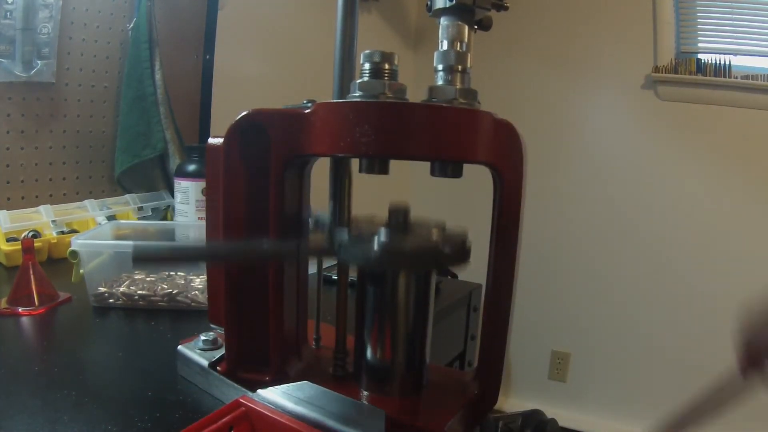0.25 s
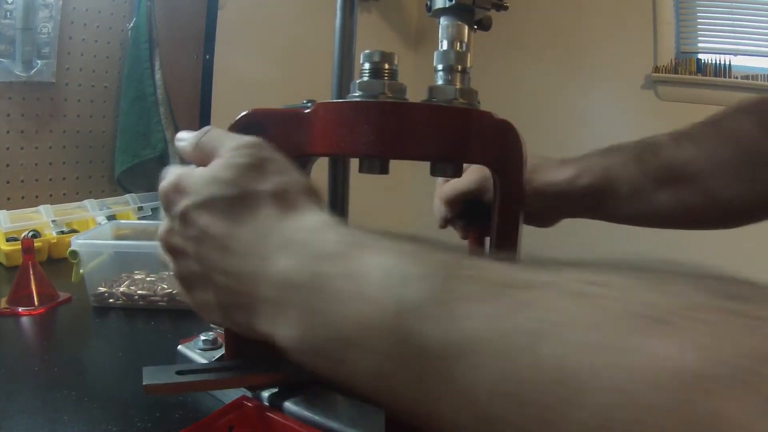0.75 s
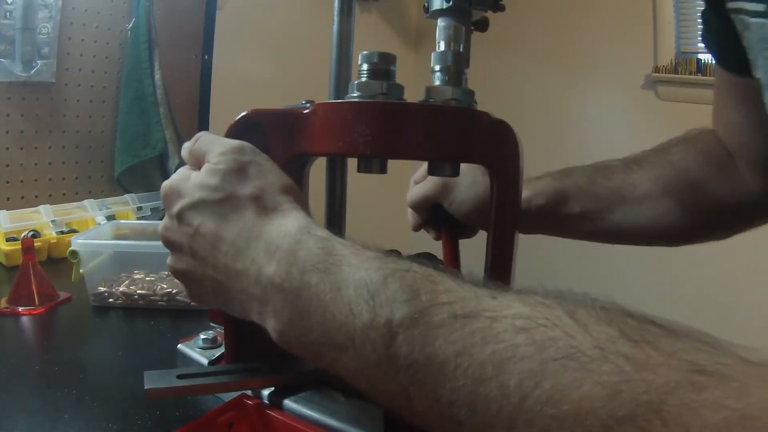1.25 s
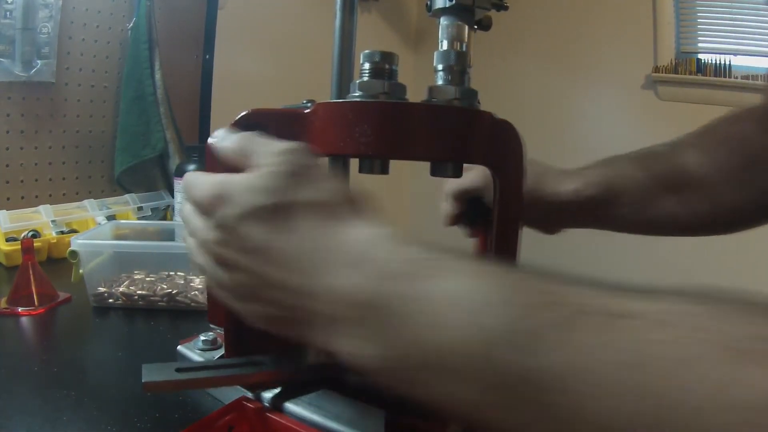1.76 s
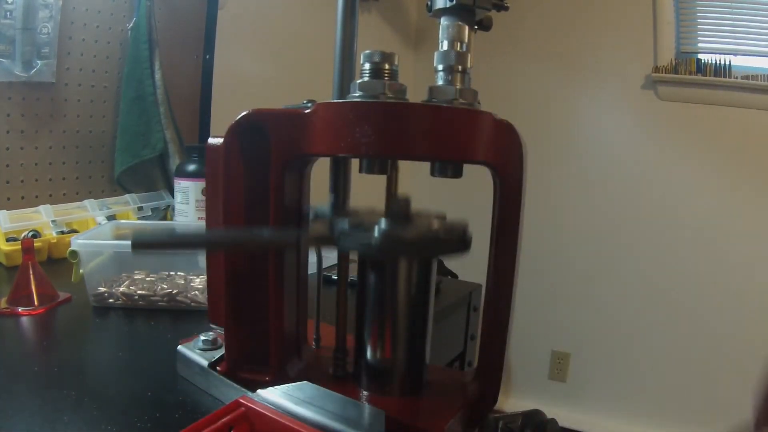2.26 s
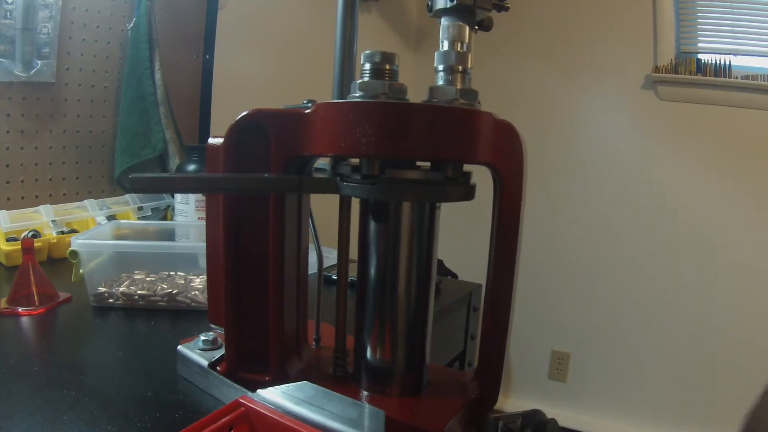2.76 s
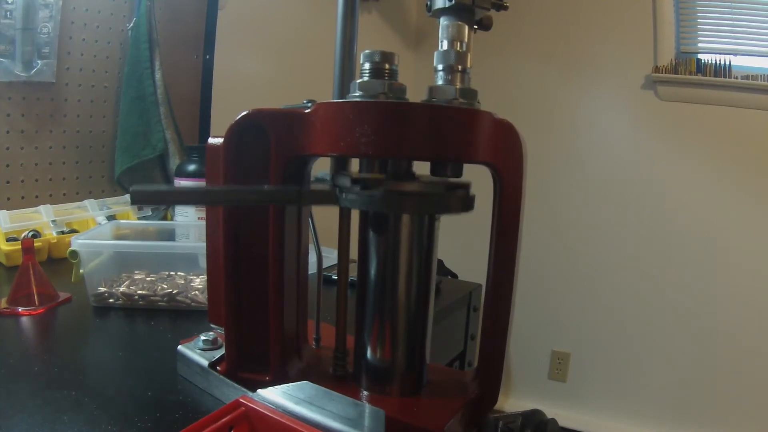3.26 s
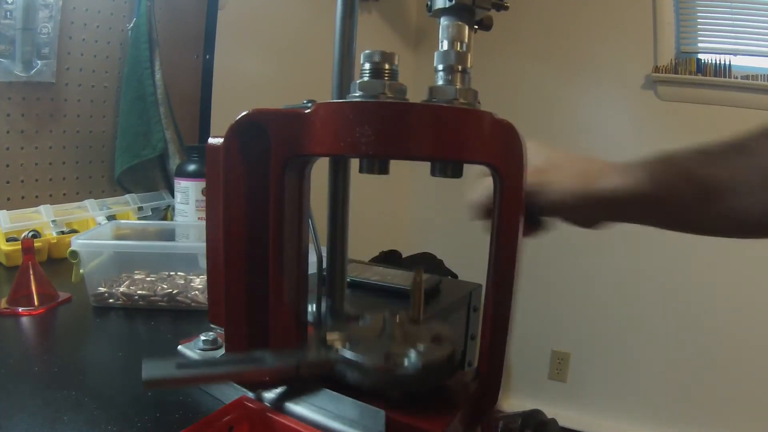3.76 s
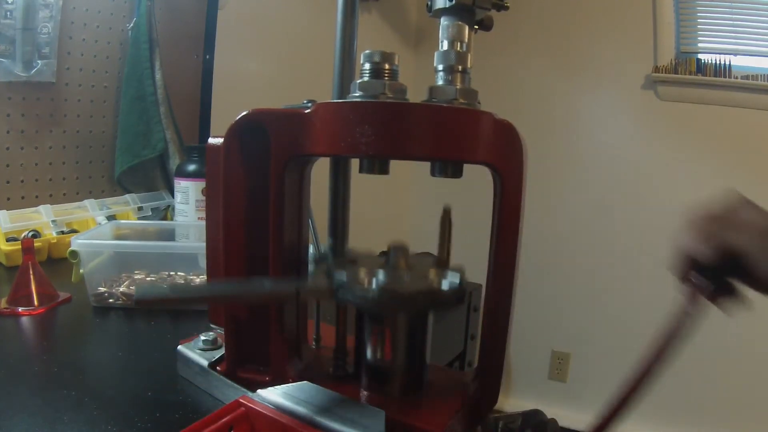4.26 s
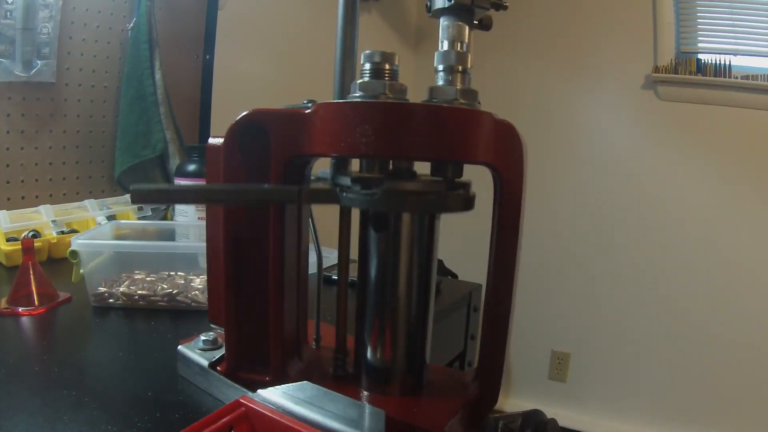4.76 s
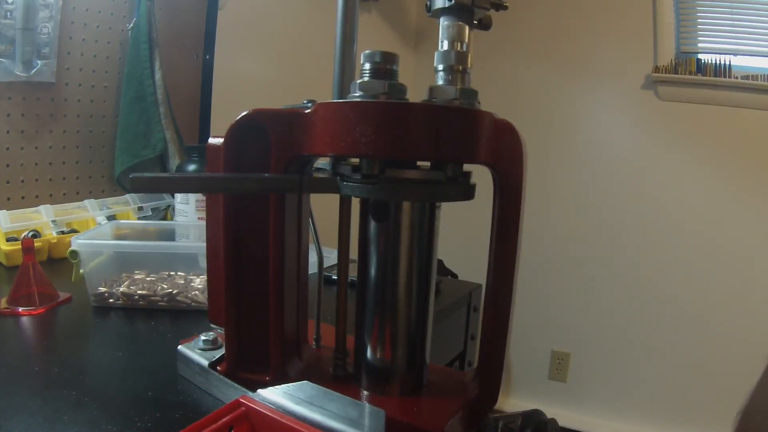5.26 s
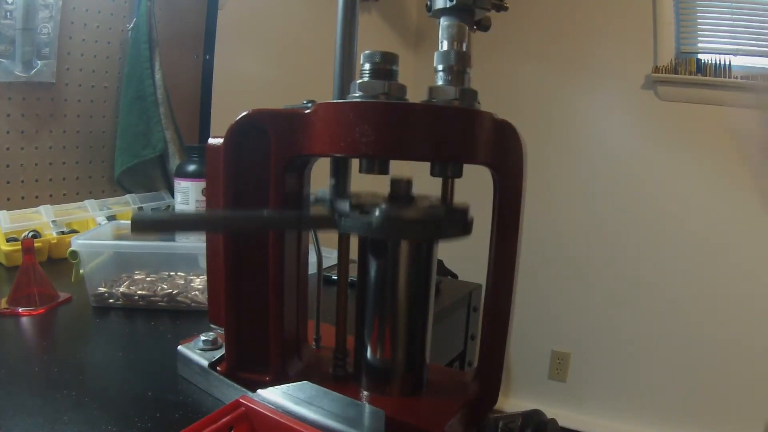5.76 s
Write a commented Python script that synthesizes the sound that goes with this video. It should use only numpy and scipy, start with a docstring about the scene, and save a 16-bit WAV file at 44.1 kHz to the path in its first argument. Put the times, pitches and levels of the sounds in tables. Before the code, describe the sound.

Close metallic clacks and heavy thunks of a bench-mounted press, with rubbing slides, faint ticks, thin squeaks and a quiet rumbling room.

```python
"""A hand-operated reloading press is cycled on a wooden workbench in a small room.
Noise shaped as a low rumble with faint hiss runs throughout; from the start the ram rubs in bursts of noise.
Then come dry ticks, thin squeaks of stacked harmonics, and dull knocks of frame noise and bench tones, each
with a shower of tiny rattles. Soon sharp steel clicks join in, made of noise and dying tones as the shell
plate turns and parts strike, and lastly cases, a spring and other struck metal ring with single dying notes."""
import sys
import numpy as np
from scipy import signal
from scipy.fft import rfft, irfft, next_fast_len
from scipy.io import wavfile
from scipy.ndimage import uniform_filter1d, map_coordinates

SR = 44100
rng = np.random.default_rng(int(sys.argv[2]) if len(sys.argv) > 2 else 0)


def unload_wav(signal):
    """Save mono or channel-first audio to the path in sys.argv[1] as 16-bit WAV at rate SR, clipped to [-1, 1]."""
    wavfile.write(
        sys.argv[1],
        SR,
        np.round(np.clip(np.atleast_2d(signal).T, -1, 1) * 32767).astype(np.int16),
    )


N = 264845  # length of the scene in samples
SIZE = 32768  # length of one short sound in samples
T = np.arange(SIZE) / SR  # time within a short sound, s
HZ = np.fft.rfftfreq(SIZE, 1 / SR)

# The shell plate snapping round by one station, once in each half of the lever's cycle:
# (time [s], base level [dB], crack against ring before fixed gains [dB], delay until the plate seats [s])
INDEXES = [(0.590, -11.5, -11.5, 0.023), (2.0887, -13, -8.5, 0.016), (3.782, -14, -8.5, .028),
           (4.244, -13, -11.5, 0.0075)]


def amp(db):
    """Turn decibels into a gain."""
    return 10 ** (np.asarray(db) / 20)


def unit(x):
    """Scale a sound to a total energy of 1."""
    return x / np.sqrt(np.sum(x ** 2) + 1e-20)


def along(points, hz):
    """Read a curve of (frequency [Hz], value) points on a logarithmic frequency axis."""
    f, v = np.transpose(points)
    return np.interp(np.log(hz + 1), np.log(f), v)


def add(track, s, x):
    """Mix the sound x into the track from time s."""
    start = max(0, round(s * SR))
    part = track[start:start + len(x)]
    part += x[:len(part)]


def coloured(x, spectrum):
    """Pass a short sound through a body that responds only after it is struck, with the given spectrum."""
    # folding the cepstrum onto positive times gives the filter its minimum phase
    cepstrum = irfft(np.log(amp(along(spectrum, HZ))))
    cepstrum[1:SIZE // 2] *= 2
    cepstrum[SIZE // 2 + 1:] = 0
    response = np.exp(rfft(cepstrum))
    return unit(irfft(rfft(x) * response))


def noise(spectrum):
    """Make steady random noise with the given spectrum and an rms of 1."""
    m = next_fast_len(N + SIZE)
    gain = amp(along(spectrum, np.fft.rfftfreq(m, 1 / SR)))
    x = irfft(rfft(rng.standard_normal(m)) * gain, m)[:N]
    return x / np.std(x)


def wobble(rate):
    """Draw a smooth random curve through a given number of random points a second."""
    points = rng.standard_normal(int(N * rate / SR) + 4)
    return map_coordinates(points, [np.arange(N) * rate / SR])


def ring(modes, scatter_db, detune):
    """Sum the dying tones of a struck body, with level and pitch a little different each time."""
    out = np.zeros(SIZE)
    for k, (hz, db, t60) in enumerate(modes):
        level, shift = rng.standard_normal(2)
        decay = amp(db + scatter_db * level - 60 * T / t60)
        out += (-1) ** k * decay * np.sin(2 * np.pi * hz * (1 + detune * shift) * T)
    return unit(out)


def in_room(x, wet_db):
    """Add the room's answer: the walls reply in uneven clumps and the bass lasts longest."""
    # Time to die away by 60 dB: (frequency [Hz], time [s])
    room_decay = [(100, 0.58), (300, 0.35), (1000, 0.26), (3000, 0.26), (6500, 0.3), (10000, 0.23),
                  (15000, 0.2)]
    hz, t, z = signal.stft(rng.standard_normal(SIZE), SR, nperseg=256)
    uneven = uniform_filter1d(rng.standard_normal(z.shape), size=3, axis=0)
    clumps = amp(4.4 * uneven + 0.5 * rng.standard_normal(len(t)))
    decay = amp(-60 * t / along(room_decay, hz)[:, None])
    tail = signal.istft(z * clumps * decay, SR, nperseg=256)[1][:SIZE]
    tail = unit(tail * (1 - np.exp(-T / 0.0018)))  # builds up over about 2 ms
    return x + amp(wet_db) * signal.fftconvolve(x, tail)[:SIZE]


def burst(envelope):
    """A flurry of micro-contacts: noise evened out over frequency, then faded by a softened envelope."""
    contacts = rng.standard_normal(SIZE) * envelope
    even = irfft(np.exp(1j * np.angle(rfft(contacts))))  # keeps the timing, flattens the spectrum
    return unit(even * envelope ** (1 / 4))


def room_air():
    """The steady rumble and hiss of the room, as shaped noise."""
    # Spectrum: (frequency [Hz], relative level per Hz [dB])
    air_spectrum = [(20, -29), (34, 7), (90, -4), (146, 0.5), (308, -5.5), (419, -7.5), (836, -9.5),
                    (1330, -16), (2510, -18), (4200, -24.5), (6010, -25), (7010, -29.5), (11700, -29),
                    (13000, -24.5), (14000, -37), (15500, -46)]
    return amp(-54) * noise(air_spectrum)


def slide():
    """The ram and links rub unevenly: each push sets in quickly, holds and dies away."""
    # Pushes of the lever that slide the ram: (time [s], length [s], level before the unevenness [dB])
    strokes = [(0, 0.017, -48), (0.456, 0.075, -47), (1.708, 0.078, -53), (2.023, 0.25, -51),
               (3.01, 0.24, -50), (3.65, 0.24, -50), (4.157, 0.14, -46.5), (4.645, 0.19, -52.5),
               (5.58, .19, -56)]
    # Rubbing spectrum: (frequency [Hz], relative level per Hz [dB])
    rub_spectrum = [(60, -3), (150, -1), (500, -10.5), (800, 0.5), (1150, -3), (1500, -16), (2100, -12.5),
                    (3000, -24.5), (7000, -24), (15000, -33)]
    attack_s, release_db_per_s = 0.0098, 152
    t = np.arange(N) / SR
    push = np.zeros(N)
    for s, length, db in strokes:
        onset = np.clip((t - s) / attack_s, 0, 1)
        push += onset * amp(db - release_db_per_s * np.maximum(t - s - length, 0))
    unevenness = amp(3.4 * wobble(35) + 1.86 * wobble(180))
    return push * unevenness * noise(rub_spectrum)


def ticking():
    """Tiny irregular slips as parts creep and a case is handled, each a single dry tick."""
    # Spells of faint ticking: (time [s], length [s])
    creeps = [(0.098, 0.14), (0.878, 0.44), (3.35, .14)]
    # Spectrum of one tick: (frequency [Hz], relative level per Hz [dB])
    tick_spectrum = [(1000, -7), (2700, 7), (5000, -8), (9000, 6), (11500, -7), (13000, 11), (14500, -20)]
    t = np.arange(N) / SR
    ticks_per_s = 87 * sum((t >= s) & (t < s + length) for s, length in creeps)
    slips = (rng.random(N) < ticks_per_s / SR) * amp(0.68 * rng.standard_normal(N))
    snap = rng.standard_normal(SIZE) * amp(-60 * T / 0.0026)
    tick = in_room(coloured(snap, tick_spectrum), wet_db=-19)
    return amp(-42.0) * signal.fftconvolve(slips, tick)[:N]


def squeaks():
    """The ram sticks and slips fast, giving a thin whistle that starts sharp and settles."""
    # Squeaks of the ram: (time [s], length [s], settled base pitch [Hz], base level [dB])
    squeak_list = [(0.304, 0.075, 3190, -59), (1.452, 0.087, 3250, -60.5)]
    # Tones above the base pitch, which is itself silent: (multiple of it, level above the base level [dB])
    squeak_tone = [(2, -6.5), (3, -7), (4, -2.5)]
    out = np.zeros(N)
    for s, length, hz, db in squeak_list:
        pitch = hz * (1 + 0.032 * np.exp(-T / 0.0099) + 0.021 * rng.standard_normal(SIZE))
        phase = 2 * np.pi * np.cumsum(pitch) / SR
        gate = np.clip(np.minimum(T, length - T) / 0.0043, 0, 1)
        tone = sum(amp(level) * np.sin(k * phase) for k, level in squeak_tone)
        add(out, s, in_room(amp(db) * gate * tone, wet_db=-12))
    return out


def all_knocks():
    """List the linkage knocks, and one more as the shell plate seats just after each snap."""
    # Linkage and ram knocking in the frame:
    # (time [s], base level [dB], bench against frame before fixed gains [dB], hardness [dB per octave])
    linkage_knocks = [(0.381, -38, -17, 2), (0.463, -37.5, -11, 3.5), (0.695, -35, -13.5, 0.5),
                      (0.814, -47, -7, -3), (1.349, -32, -16, -5), (1.634, -34, -15.5, -4),
                      (1.657, -36.5, -2, -4.5), (1.823, -34, -9, -2), (1.939, -34, -21, -0.5),
                      (2.014, -33.5, -7, 3.5), (2.681, -34, -10.5, 0.5), (2.831, -26, -5, -2.5),
                      (3.11, -29, -2.5, 5), (3.122, -17.5, -10.5, -1.5), (3.660, -25.5, -20, 2),
                      (3.869, -27.5, -10, -2), (3.999, -29, -11.5, 2), (4.099, -30, -15.5, -1.5),
                      (4.599, -24.5, -12.5, 3.5), (4.790, -38, -14, -8), (4.968, -35, -7.5, -1.5),
                      (5.082, -23, -9, -5.5), (5.462, -29.5, -6, 2), (5.476, -20.5, -11, 2),
                      (5.649, -32, -9, 2), (5.7874, -13, -24, 3)]
    seat_db = -13  # base level against that of the snap
    seat_bench_db, seat_hardness = -20, -1.4  # as in the table's last two columns
    seats = [(s + delay, db + seat_db, seat_bench_db, seat_hardness) for s, db, _, delay in INDEXES]
    return linkage_knocks + seats


def knocks():
    """Heavy contacts take up play in the linkage, ring the cast frame briefly and rock the bench top."""
    # Frame response: (frequency [Hz], relative level per Hz [dB])
    frame_spectrum = [(60, -34), (300, -2), (480, -9.5), (620, -3), (820, 4.5), (1080, 2.5), (1400, -9.5),
                      (1900, -5.5), (2600, -15.5), (4000, -20), (7000, -26.5), (15000, -43)]
    # Tones of the bench top: (frequency [Hz], relative level [dB], time to fall 60 dB [s])
    bench_modes = [(42, -21, 0.32), (69, -1.5, 0.091), (129.6, -5, 0.27), (183.3, -3.5, 0.19),
                   (258, -13.5, 0.28), (319.7, 0.5, 0.14), (359, -4, 0.078), (474, 2.5, 0.043)]
    out = np.zeros(N)
    for s, db, bench_db, hardness in all_knocks():
        # a slow, heavy push rocks the bench more: the load time [s] doubles for every 14 dB of bench
        load = 0.0082 * 2 ** (bench_db / 14)
        push = burst((T / load) * np.exp(-T / load))
        # a softer contact feeds the lower part of the frame's response
        colour = [(hz, level + hardness * np.log2(max(hz, 300) / 900)) for hz, level in frame_spectrum]
        frame = in_room(amp(18.5) * coloured(push, colour), wet_db=-0.5)
        bench_tones = ring(bench_modes, scatter_db=5.0, detune=0.023)
        bench = in_room(amp(bench_db + 27) * bench_tones, wet_db=-4.5)
        add(out, s, amp(db) * (frame + bench))
    return out


def jolts():
    """List the chatter of loose parts set off by each knock, stronger the harder the knock is."""
    jolt_db, db_per_hardness = -20.5, 0.2  # base level against the knock's; gain per step of hardness
    swell_s, part_hz, part_db = 0.014, 11030, -17.5  # as in the last three columns of the rattles
    return [(s, db + jolt_db + db_per_hardness * hardness, swell_s, part_hz, part_db)
            for s, db, _, hardness in all_knocks()]


def rattles():
    """A swelling and dying shower of tiny contacts, coloured by the loose part's resonance."""
    # More chatter and scrapes of loose parts, some with a knock, some between knocks:
    # (time [s], base level [dB], time to swell to the peak [s], part's resonance [Hz],
    # resonance level above the chatter [dB])
    loose_parts = [(1.075, -49, 0.0064, 620, 19), (1.35, -43, 0.014, 580, 25),
                   (1.651, -44.5, 0.014, 600, 25), (3.03, -51, 0.044, 10700, -10),
                   (3.119, -37, 0.013, 10600, -3.5), (3.655, -39.5, 0.0031, 4070, 2),
                   (3.867, -32, 0.0047, 1670, 23), (4.044, -42, 0.01, 3200, -3),
                   (4.33, -45.5, 0.0079, 11600, -9), (4.534, -38, 0.0037, 3780, 4),
                   (4.659, -40, 0.01, 7800, -28), (4.69, -43.5, 0.014, 1090, 25),
                   (4.79, -46.5, 0.014, 1110, 31), (5.645, -45, 0.0074, 2300, 15)]
    # Chatter spectrum: (frequency [Hz], relative level per Hz [dB])
    chatter_spectrum = [(200, 0.5), (800, 7), (1400, 3.5), (2000, 0), (2800, -1), (4500, -5), (7000, -11.5),
                        (9500, -9.5), (11400, -8.5), (12200, -50), (13000, -5), (15500, -73)]
    out = np.zeros(N)
    for s, db, swell, hz, part_db in loose_parts + jolts():
        hits = (rng.random(SIZE) < 1500 / SR) * rng.standard_normal(SIZE)  # about 1500 a second
        contacts = hits * (T / swell) * np.exp(-T / swell)
        part = unit(signal.lfilter(*signal.iirpeak(hz, 8, SR), contacts))
        shower = unit(coloured(contacts, chatter_spectrum) + amp(part_db) * part)
        # a longer shower carries more energy
        add(out, s, amp(db) * np.sqrt(swell * SR) * in_room(shower, wet_db=-1.5))
    return out


def clicks():
    """A hard steel contact: a spike, a few ms of dense ringing, and the tones of the shell plate."""
    # Steel parts striking: (time [s], base level [dB], crack against ring before fixed gains [dB])
    steel_strikes = [(0.445, -27, -14.5), (0.691, -32, -31), (0.887, -48, -15), (0.949, -38, -28),
                     (1.35, -40, -40), (1.824, -32.5, -34), (1.875, -26, -15), (1.936, -33.5, -33),
                     (3.636, -27.5, -28), (3.989, -29.5, -16), (4.048, -31.5, -14), (4.172, -35.5, -30),
                     (4.535, -39, 1), (4.599, -24, -14), (5.414, -37.5, -33), (5.463, -33, -15),
                     (5.641, -31.5, -28), (5.787, -16, 1.5), (5.793, -19, -6)]
    # Sharp crack: (frequency [Hz], relative level per Hz [dB])
    crack_spectrum = [(400, -72), (1200, 0), (2500, -16), (3600, 5.5), (4100, -4), (5500, 5), (7000, 5),
                      (8000, -1), (9300, 1), (10300, -8), (12500, -9.5), (15500, -27)]
    # The plate's dense response: (frequency [Hz], relative level per Hz [dB])
    plate_spectrum = [(300, -11.5), (750, -1.5), (1400, 2.5), (1900, 5), (2400, 4.5), (3400, -5.5),
                      (4200, -2), (9000, -13), (15000, -55)]
    # Catch and shell plate tones: (frequency [Hz], relative level [dB], time to fall 60 dB [s])
    steel_modes = [(1330, -13.5, 0.051), (1693, 1.5, 0.0096), (1905, 3.5, 0.053), (3328, 8.5, 0.017),
                   (3256, 3, 0.02), (4850, -14, 0.042), (6700, -12, 0.073)]
    out = np.zeros(N)
    spike = T == 0
    for s, db, crack_db, *_ in INDEXES + steel_strikes:
        high, low = rng.standard_normal((2, SIZE))
        crack = coloured(.5 * spike + unit(high * amp(-60 * T / 0.041)), crack_spectrum)
        plate = coloured(.7 * spike + unit(low * amp(-60 * T / 0.021)), plate_spectrum)
        hit = in_room(amp(9) * plate + amp(crack_db + 17.5) * crack, wet_db=0.0)
        # the plate faces the listener, so its ring arrives direct, without the room
        modes = ring(steel_modes, scatter_db=2, detune=.015)
        add(out, s, amp(db) * (hit + amp(7.5) * modes))
    return out


def pawl_notes():
    """List the brief ring of the pawl at each snap of the shell plate."""
    hz, pawl_db, t60_s = 2000, -12, 0.029  # pawl_db is against the snap's base level
    return [(s, hz, db + pawl_db, t60_s) for s, db, _, _ in INDEXES]


def pings():
    """Each struck part rings with one dying note, made rough as it jiggles in its seat."""
    # Single parts: cases, a spring, the ram's plate and other struck metal:
    # (time [s], frequency [Hz], level before decay and jiggle [dB], time to fall 60 dB [s])
    ringing_parts = [(0.472, 9750, -41.5, 0.055), (0.692, 3300, -44, .018), (1.825, 1330, -29.5, 0.02),
                     (2.105, 9750, -27, 0.071), (3.13, 11200, -44, 0.17), (3.141, 8300, -38.5, 0.09),
                     (3.128, 828, -23, 0.067), (3.662, 920, -28, 0.1), (4.46, 2100, -51, 0.11),
                     (4.536, 11300, -51, 0.38), (4.245, 12000, -39, .08), (4.6, 325, -24, 0.077),
                     (5.478, 863, -26.5, 0.084), (5.789, 1063, -24, 0.2)]
    out = np.zeros(N)
    attack = 1 - np.exp(-T / .0005)
    for s, hz, db, t60 in ringing_parts + pawl_notes():
        jiggle = 0.35 * wobble(hz / 30)[:SIZE]  # shakes both loudness and phase
        tone = (1 + jiggle) * np.sin(2 * np.pi * hz * T + jiggle)
        note = tone * amp(db - 60 * T / t60) * attack
        add(out, s, in_room(note, wet_db=-4.5))
    return out


def scene():
    """Mix the moving press with the steady rumble and hiss of the room."""
    steady = room_air() + slide()
    small = ticking() + squeaks()
    struck = knocks() + rattles() + clicks() + pings()
    return (steady + small + struck)[None]


def record(dry):
    """Cut away everything from 15700 Hz up."""
    m = next_fast_len(N + SIZE)
    keep = np.fft.rfftfreq(m, 1 / SR) < 15700
    return irfft(rfft(dry, m) * keep, m)[:, :N]


dry = scene()
out = record(dry)
unload_wav(out)
```